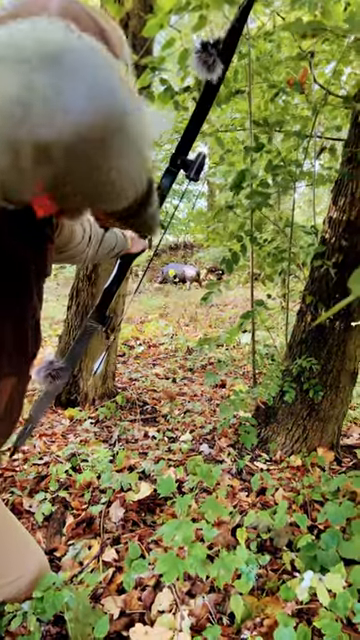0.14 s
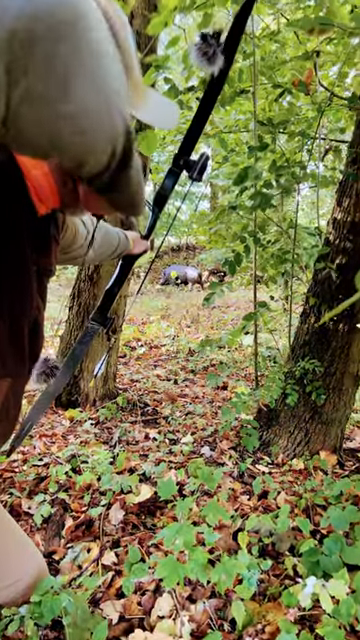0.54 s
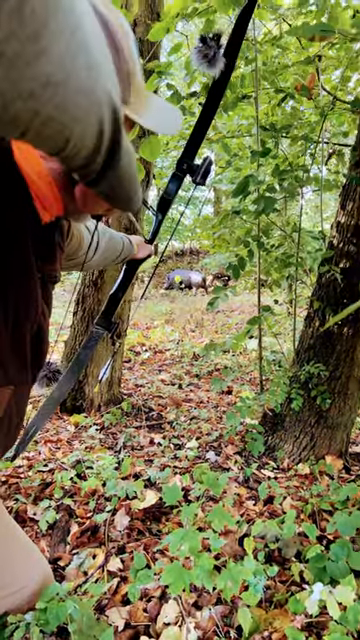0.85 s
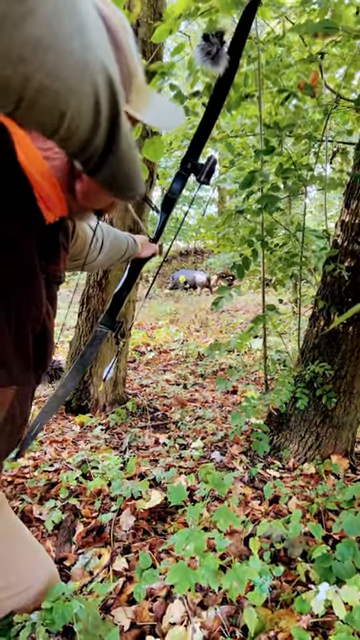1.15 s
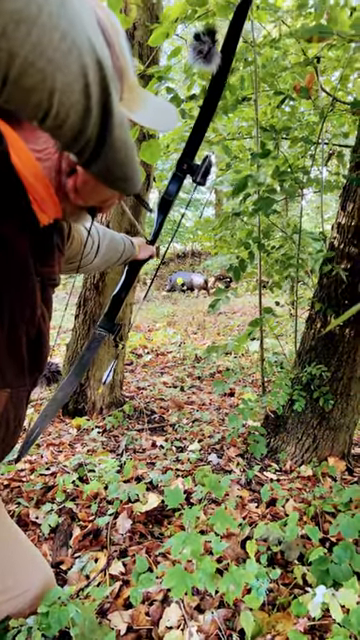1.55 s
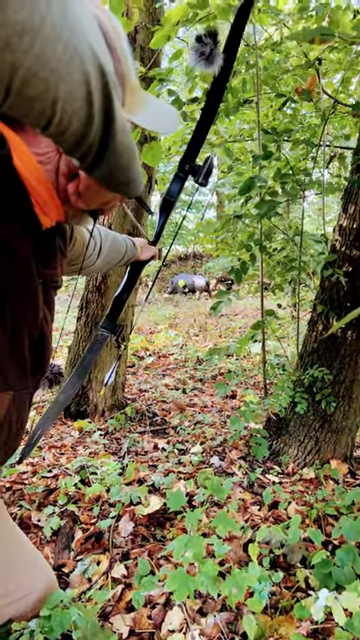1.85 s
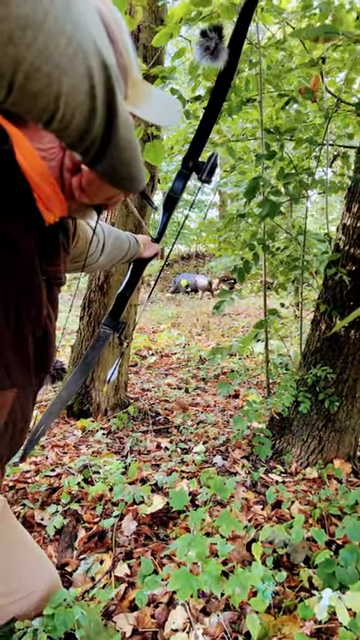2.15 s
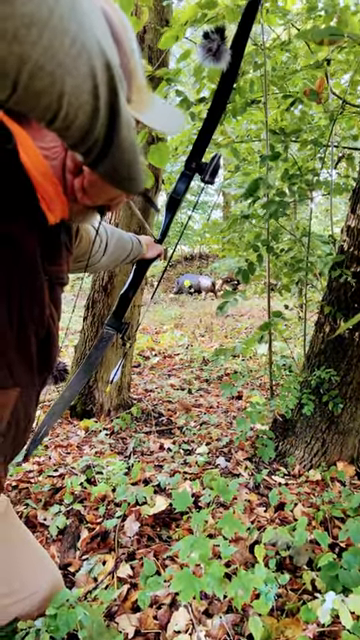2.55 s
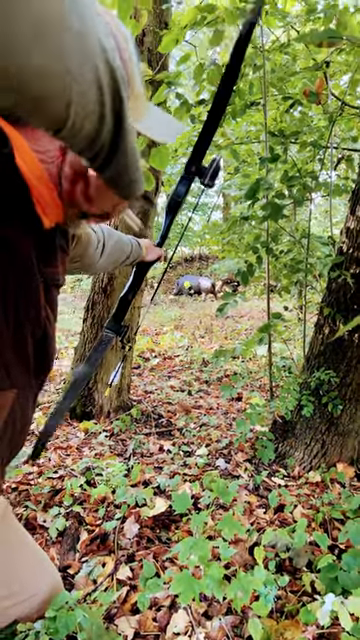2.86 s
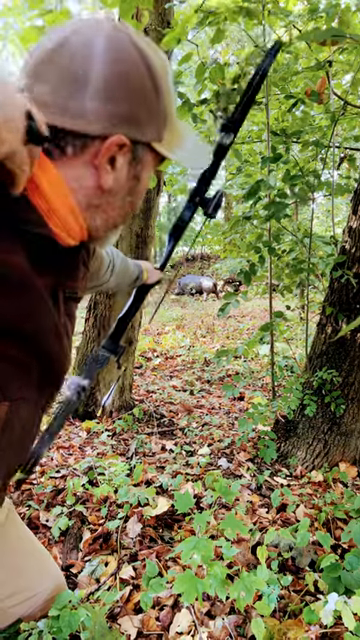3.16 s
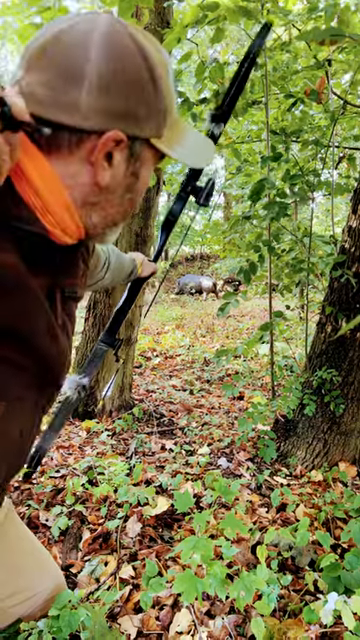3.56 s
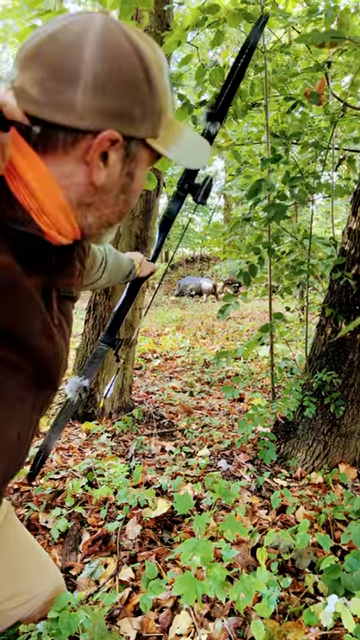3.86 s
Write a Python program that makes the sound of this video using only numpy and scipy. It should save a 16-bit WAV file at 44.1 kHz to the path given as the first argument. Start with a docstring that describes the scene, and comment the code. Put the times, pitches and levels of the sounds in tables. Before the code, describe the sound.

A bow shot in a quiet forest. For about 2.9 seconds there is only very faint low rumble, soft leaf hiss, small crackles near 0.3 and 1.1 seconds, and dull scuffs at 0.5, 1.9 and 2.7. At 2.9 a loud close string snap and slap rattles and hums briefly. At 3.1 a weaker distant double crack and thud echoes through trees; a tiny dry tick follows at 3.3, then quiet.

```python
"""In a quiet wood with still air, a low rumble and fading leaf hiss, small crackles and scuffs are heard.
Then a recurve bow is shot close by: noise bursts make the string's slip, the arrow's scrape and the slap,
and fading sine tones make the snap, the ringing bow and the hum. Fading noise gives an echo among the trees.
A fifth of a second later the arrow hits a distant target: two cracks, a thud of falling pitch and
a stronger echo. Last, a dry leaf or twig ticks."""
import sys
import numpy as np
from scipy import signal
from scipy.fft import rfft, irfft
from scipy.io import wavfile
from scipy.ndimage import uniform_filter1d

SR = 44100
rng = np.random.default_rng(int(sys.argv[2]) if len(sys.argv) > 2 else 0)


def pcm_store(signal):
    """Save signal as 16-bit PCM."""
    levels = np.round(np.clip(np.atleast_2d(signal), -1, 1) * 32767)
    wavfile.write(sys.argv[1], SR, levels.astype(np.int16).T)


N = 176400  # length of the scene (samples)
AGE = np.arange(SR) / SR  # time since an event begins (s); every event lasts at most one second

# start times (s)
SLIP_S, SCRAPE_S, SNAP_S, SLAP_S, HIT_S, TICK_S = 2.8985, 2.912, 2.9195, 2.9245, 3.1175, 3.317


def undb(db):
    """Turn decibels into a gain."""
    return 10 ** (np.asarray(db) / 20)


def read(table, hz):
    """Look up a table's value at a frequency, with straight lines on a log-frequency axis."""
    table_hz, values = np.array(table).T
    return np.interp(np.log(np.maximum(hz, 1)), np.log(table_hz), values)


def noise(spectrum, size=N):
    """Shape white noise to a given colour, with an rms of 1."""
    hz = np.fft.rfftfreq(size, 1 / SR)
    white = rfft(rng.standard_normal(size))
    coloured = irfft(white * undb(read(spectrum, hz)), size)
    return coloured / np.std(coloured)


def walk(rate):
    """Wander at random around zero with a spread of about 1, taking `rate` new values a second."""
    step = max(int(SR / rate), 1)
    stairs = np.repeat(rng.standard_normal(N // step + 1), step)
    smooth = uniform_filter1d(stairs, step)[:N]
    return smooth / np.std(smooth)


def envelope(attack, t60, hold=0):
    """Rise in a straight line, hold, then fall by 60 dB every t60 seconds."""
    rise = np.minimum(AGE / attack, 1)
    fall_time = np.maximum(AGE - attack - hold, 0)
    return rise * np.exp(-np.log(1000) * fall_time / t60)


def at(start, x):
    """Place a short sound in the scene."""
    return np.pad(x, (int(start * SR), N))[:N]


def ring(modes, start, attack):
    """One blow sets off several tones, each fading at its own speed."""
    tones = sum(undb(db) * envelope(attack, t60) * np.sin(2 * np.pi * hz * AGE) for hz, db, t60 in modes)
    return at(start, tones)


def burst(spectrum, start, db, attack, t60, hold=0):
    """Things in brief contact make a short spell of coloured noise."""
    return at(start, undb(db) * noise(spectrum, size=len(AGE)) * envelope(attack, t60, hold))


AIR_DB = -71.3  # steady level of the still air
# colours of the still air, the low rumble and the leaf hiss: (frequency [Hz], relative level [dB])
AIR_COLOUR = [(25, -20), (45, -2), (65, 3), (110, -3), (170, -9), (240, -7), (400, -12), (800, -18.5),
              (1300, -21), (1900, -19), (2600, -23.5), (6000, -25.5), (8000, -36.5), (11000, -34),
              (13000, -43), (15500, -45.5)]
RUMBLE_COLOUR = [(60, -15.5), (120, -2), (190, 3), (270, -1.5), (340, -9.5), (500, -13), (800, -24.5),
                 (2000, -44.5)]
LEAF_COLOUR = [(300, -17.5), (1000, -3.5), (2500, -0.5), (6000, -1), (8000, -10.5), (10000, -12),
               (15000, -25)]
# slow rise and fall of the rumble and of the leaf hiss, before their wavering: (time [s], level [dB])
RUMBLE_LEVEL = [(0, -85), (.25, -82), (.55, -73.5), (.95, -70), (1.07, -77), (1.16, -65.5), (1.35, -75),
                (1.65, -68.5), (1.8, -74.5), (2.0, -79), (2.2, -66.5), (2.5, -69.5), (2.8, -67.5),
                (3.6, -64.5), (4, -66)]
LEAF_LEVEL = [(0, -76), (.33, -73), (.7, -79.5), (1.2, -74.5), (1.6, -82), (2.4, -83.5), (4, -96.5)]


def forest():
    """Three layers of noise: steady air, a wavering low rumble and soft, flickering leaf hiss."""
    time = np.arange(N) / SR
    rumble_db = np.interp(time, *np.array(RUMBLE_LEVEL).T) + 1.5 * walk(24)
    leaf_db = np.interp(time, *np.array(LEAF_LEVEL).T) + 1.2 * walk(16) + 1.2 * walk(300)
    air = undb(AIR_DB) * noise(AIR_COLOUR)
    return air + undb(rumble_db) * noise(RUMBLE_COLOUR) + undb(leaf_db) * noise(LEAF_COLOUR)


# small crackles of clothing and dry leaves, then dull scuffs of clothing: (time [s], level [dB])
CRACKLES = [(.335, -77.5), (1.066, -66.5), (1.097, -71), (1.13, -74), (1.194, -75)]
SCUFFS = [(.54, -67.5), (1.87, -73), (2.73, -71.5)]
# colours of a crackle, a scuff and the dry tick: (frequency [Hz], relative level [dB])
CRACKLE_COLOUR = [(1000, -5), (4500, 5), (8000, -2), (11000, -4), (15000, -30)]
SCUFF_COLOUR = [(150, -8), (400, 0), (800, -5), (1500, -10), (4000, -18.5), (9000, -35)]
TICK_COLOUR = [(2000, -12), (6000, -5), (11000, 0.5), (15500, -9)]


def small_sounds():
    """Light rubbing makes quick crackles and slower scuffs; a dry leaf or twig ticks after the hit."""
    crackles = sum(burst(CRACKLE_COLOUR, s, db=db, attack=.0019, t60=.12) for s, db in CRACKLES)
    scuffs = sum(burst(SCUFF_COLOUR, s, db=db, attack=.025, t60=.29) for s, db in SCUFFS)
    tick = burst(TICK_COLOUR, TICK_S, db=-67, attack=.001, t60=.05)
    return crackles + scuffs + tick


# how long sound takes to fade by 60 dB among the trees: (frequency [Hz], fade time [s])
WOOD_T60 = [(150, 0.76), (530, .6), (1400, .56), (3700, .47), (9700, .38), (15000, .3)]
# colour of the echo from deeper in the wood: (frequency [Hz], relative level [dB])
LATE_COLOUR = [(100, -5.5), (500, 3.5), (1500, 1), (4000, -4.5), (7000, -13), (12000, -35)]


def trees(spectrum, start, db, rise_s, hold_s):
    """Countless small reflections from trunks and leaves merge into a noise wash; the treble dies first."""
    hz = np.fft.rfftfreq(len(AGE), 1 / SR)
    flicker = undb(1.3 * walk(250)[:len(AGE)])
    scatter = rfft(noise(spectrum, size=len(AGE)) * flicker)
    centres = np.geomspace(100, 16000, 8)  # middles of eight overlapping bands (Hz)
    wash = 0
    for centre, share in zip(centres, np.eye(len(centres))):
        # each band is full at its own centre and gone at its neighbours' centres
        band = irfft(scatter * read(np.c_[centres, share], hz))
        wash = wash + band * envelope(rise_s, read(WOOD_T60, centre), hold_s)
    # the echo from deeper in the wood swells slowly; its level is relative to the whole echo
    late = burst(LATE_COLOUR, start, db=-21, attack=.12, t60=1.34)
    return undb(db) * (at(start, wash) + late)


# colour of the bow's echo: (frequency [Hz], relative level [dB])
BOW_ECHO_COLOUR = [(60, -11), (200, 6), (450, 2), (900, -5), (2000, 0), (2700, 3.5), (4000, 0), (6000, 1.5),
                   (8000, -8.5), (15000, -6.5)]


def bow_echo():
    """The trees answer the near bow with a faint wash."""
    return trees(BOW_ECHO_COLOUR, SLAP_S, db=-51, rise_s=.02, hold_s=.08)


# colour of the target's echo: (frequency [Hz], relative level [dB])
HIT_ECHO_COLOUR = [(60, 10), (150, 15), (400, 4), (800, -1), (1700, 0), (3000, 0.5), (6000, 0),
                   (8000, -6.5), (11000, -8), (15000, -16.5)]


def hit_echo():
    """The trees answer the far hit with a stronger wash."""
    return trees(HIT_ECHO_COLOUR, HIT_S, db=-41, rise_s=.015, hold_s=.008)


# the point breaks the skin, then the shaft drives in: (time [s], level [dB])
CRACKS = [(3.116, -30.5), (3.1219, -33)]
# colour of a crack: (frequency [Hz], relative level [dB])
CRACK_COLOUR = [(350, -25), (600, -17), (870, -17.5), (1650, -0.5), (2500, -8), (3800, -7.5), (5400, -4),
                (7100, -12.5), (8300, -7.5), (11000, -16.5), (12700, -9.5), (15500, -11.5)]
THUD_START_HZ, THUD_END_HZ = 470, 124
THUD_SAG_S = .005  # time for the pitch to fall about two thirds of the way


def arrow_hit():
    """Two dry cracks, and a dull thud whose pitch falls as the shaft is braked."""
    cracks = sum(burst(CRACK_COLOUR, s, db=db, attack=.001, t60=.037, hold=.002) for s, db in CRACKS)
    hz = THUD_END_HZ + (THUD_START_HZ - THUD_END_HZ) * np.exp(-AGE / THUD_SAG_S)
    tone = np.sin(2 * np.pi * np.cumsum(hz) / SR)
    thud = undb(-22.5) * tone * envelope(attack=.004, t60=.055, hold=.013)
    return cracks + at(HIT_S, thud)


# colours of the string's slip, the arrow's scrape, the slap and the rattle:
# (frequency [Hz], relative level [dB])
SLIP_COLOUR = [(90, -14), (170, -4.5), (260, 9.5), (380, -4.5), (550, -6), (1200, -2.5), (1900, -14),
               (3500, -10.5), (5400, -11), (8000, -18.5), (15000, -26.5)]
SCRAPE_COLOUR = [(250, -1.5), (500, -10), (1000, -11.5), (2000, -15), (2700, -14.5), (3500, -5.5),
                 (4400, -1), (5500, -3.5), (7500, -21), (15000, -25)]
SLAP_COLOUR = [(100, -5.5), (450, -1.5), (700, -21.5), (1300, -7), (1900, -10), (2400, 1), (3300, 1),
               (4500, -5), (6500, -3), (7600, -15), (9500, -13), (12000, -21), (15000, -21)]
RATTLE_COLOUR = [(180, -39), (300, 0), (541, -11), (1490, -8), (1650, -16), (2870, -9.5), (4620, -13),
                 (5180, -9.5), (15000, -37.5)]
# bright click of the nock leaving the string: (frequency [Hz], peak level [dB], fade time to -60 dB [s])
NOCK_MODES = [(5195, -12, .038), (5262, -14, .05), (5760, -12, .042)]
# limbs, riser and arrow shaft ringing: (frequency [Hz], peak level [dB], fade time to -60 dB [s])
BOW_MODES = [(152, -11.5, 0.041), (238, -13.5, .06), (400, -19.5, .11), (482.6, -30, 0.11),
             (772, -26, 0.11), (1090, -15.5, .08), (1534, -25, .09), (2378, -22, .055), (2810, -18.5, .06),
             (3110, -20, 0.05), (3308, -28, .08), (3540, -22, .06), (3806, -25.5, .06), (4340, -28, 0.095),
             (4648, -24, .06)]
# string and limbs swinging on: (frequency [Hz], peak level [dB], fade time to -60 dB [s])
HUM_MODES = [(66, -30.5, .15), (97.5, -21.5, .17), (97.4, -33, .8), (139.7, -31.5, .55), (193, -29, .21)]


def bow():
    """The string slips, the arrow scrapes, and the snap and slap leave the bow ringing, rattling and humming."""
    slip = burst(SLIP_COLOUR, SLIP_S, db=-29.5, attack=.009, t60=.05, hold=.007)
    scrape = burst(SCRAPE_COLOUR, SCRAPE_S, db=-17.5, attack=.0039, t60=.036, hold=.007)
    nock_click = ring(NOCK_MODES, SNAP_S, attack=.0036)
    bow_ring = ring(BOW_MODES, SNAP_S, attack=.004)
    slap = burst(SLAP_COLOUR, SLAP_S, db=-15, attack=.0014, t60=.053, hold=.0017)
    steady_rattle = burst(RATTLE_COLOUR, SLAP_S, db=-26.5, attack=.012, t60=.17)
    rattle = steady_rattle * undb(2 * walk(400))  # quick, uneven flicker
    hum = ring(HUM_MODES, SLAP_S, attack=.036)
    return slip + scrape + nock_click + bow_ring + slap + rattle + hum


def scene():
    """Add all layers; the near bow is almost dry and the far target has much more echo."""
    echo = bow_echo() + hit_echo()
    return (forest() + small_sounds() + echo + arrow_hit() + bow())[None]


PEAK_LIMIT = .86  # largest swing before the top cut (full scale is 1)
BASS_CUT_HZ, TOP_HZ = 48, 15900


def record(dry):
    """The microphone drops the deepest bass, flattens the highest peaks and cuts the top."""
    bass_cut = signal.butter(4, BASS_CUT_HZ, "high", fs=SR, output="sos")
    top_cut = signal.ellip(10, .2, 80, TOP_HZ, fs=SR, output="sos")
    flattened = np.clip(signal.sosfilt(bass_cut, dry), -PEAK_LIMIT, PEAK_LIMIT)
    return signal.sosfilt(top_cut, flattened)


dry = scene()
out = record(dry)
pcm_store(out)
```